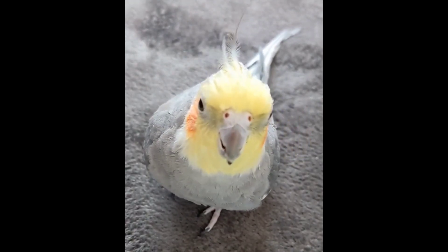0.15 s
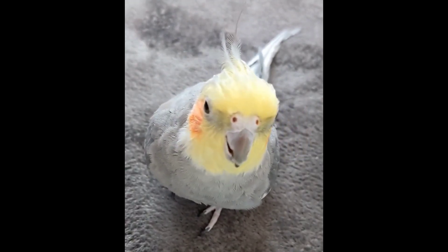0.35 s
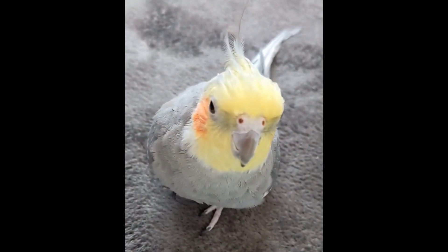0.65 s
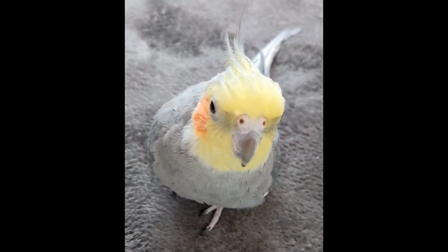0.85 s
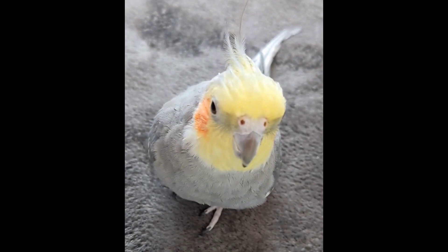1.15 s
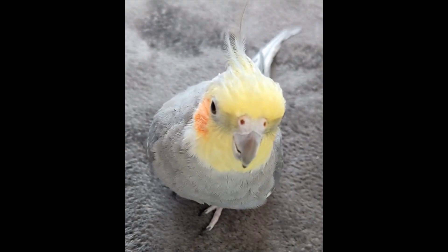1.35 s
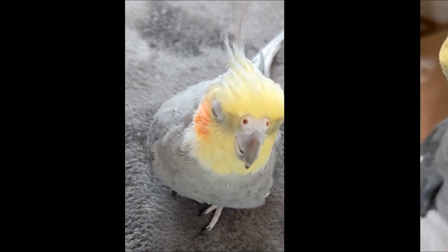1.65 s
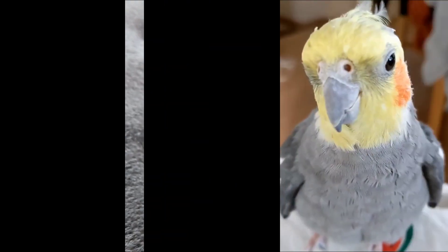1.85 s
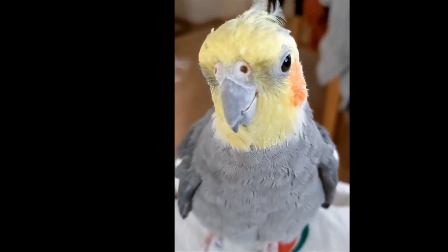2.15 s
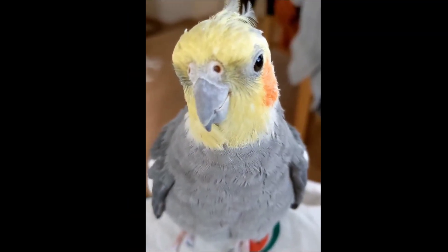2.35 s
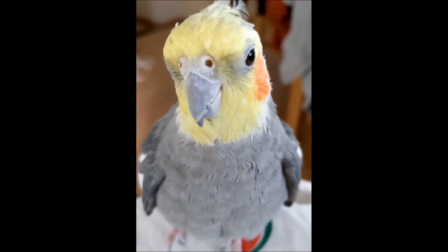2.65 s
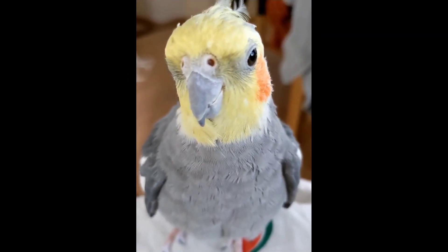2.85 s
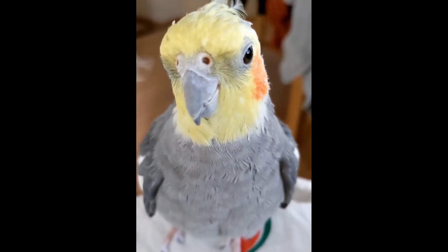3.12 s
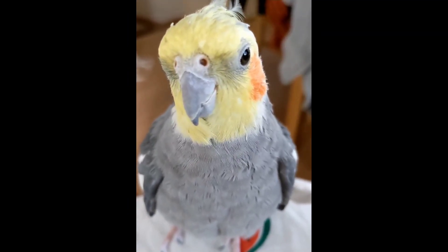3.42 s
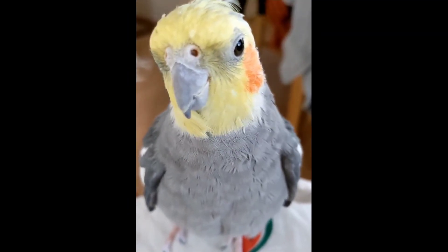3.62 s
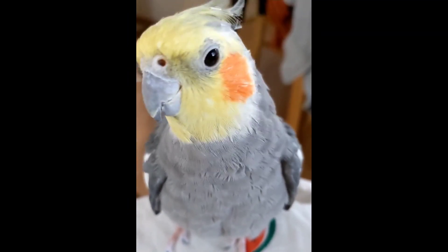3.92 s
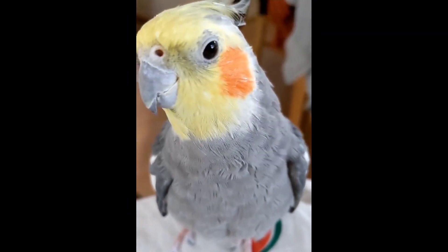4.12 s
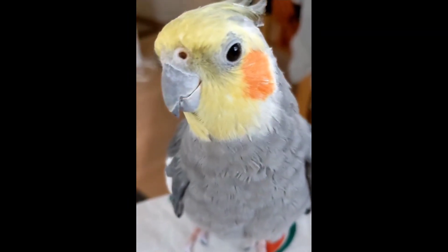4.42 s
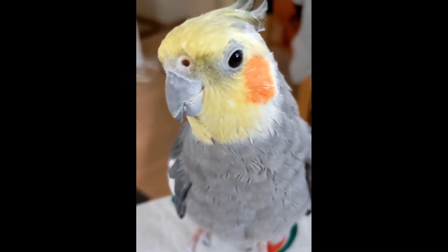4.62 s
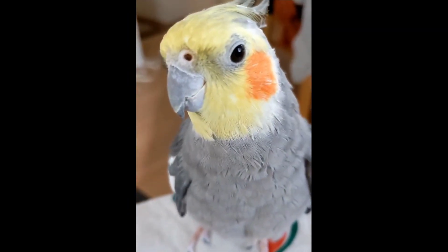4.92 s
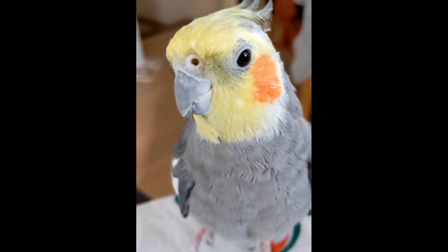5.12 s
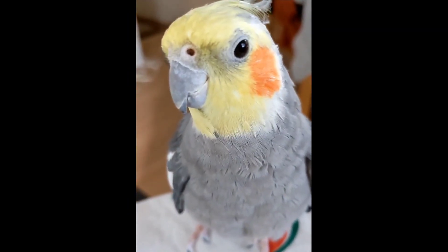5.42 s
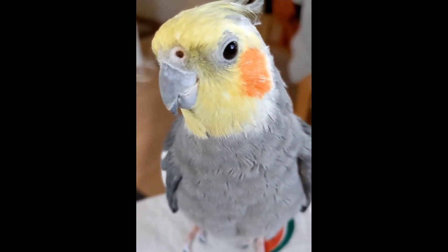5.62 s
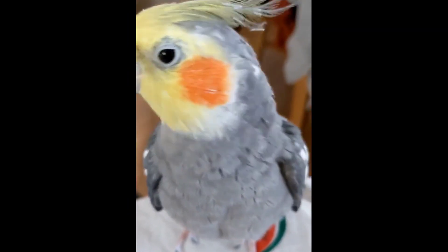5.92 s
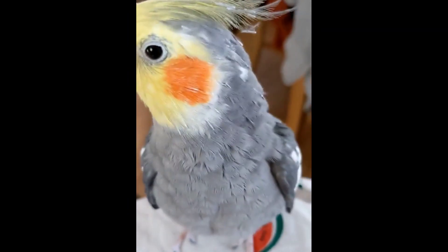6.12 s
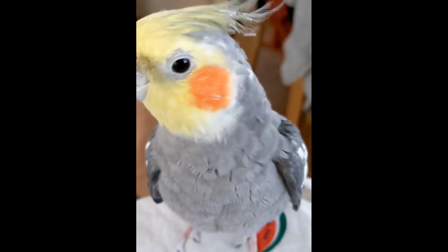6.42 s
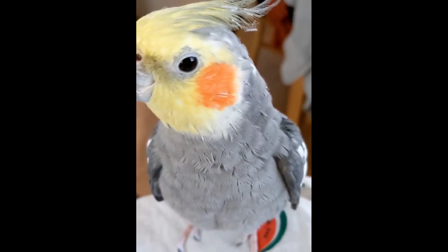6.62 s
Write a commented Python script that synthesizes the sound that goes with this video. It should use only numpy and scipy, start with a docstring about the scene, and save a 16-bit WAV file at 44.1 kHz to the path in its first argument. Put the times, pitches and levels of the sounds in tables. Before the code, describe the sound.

Over a faint humming rumble, one cockatiel chirps reedily and slides sharply up and then down, its later notes weakening. A second bird overlaps it, growing louder with clear, rounded whistles separated by short gaps. The hum gives way to thin room air. Quiet peeps, beak ticks and brief feather rustles sit between calls, all close-miked with a short room ring, drier on the first bird.

```python
"""A low humming rumble gives way to lighter room air as two cockatiels call close to a stereo microphone.
The first bird opens with reedy chirps and two wide slides, then fainter, sometimes rasping notes.
The second joins it and goes on alone, with clear arched whistles and soft falling peeps; rustles and ticks dot the calls.
Each note is a train of syrinx pulses on an arch or slide of pitch, rough at its ends.
Throat and beak filter the pulses, and the room adds a short ring, drier for the first bird."""
import sys
import numpy as np
from scipy import signal
from scipy.fft import rfft, irfft, next_fast_len
from scipy.io import wavfile
from scipy.ndimage import uniform_filter1d, minimum_filter1d

SR = 44100
rng = np.random.default_rng(int(sys.argv[2]) if len(sys.argv) > 2 else 0)


def bounce(signal):
    """Save signal as a 16-bit WAV file at the path given by the first command-line argument."""
    frames = np.transpose(np.atleast_2d(signal))
    limited = np.clip(frames, -1, 1)
    pcm = np.round(limited * 32767).astype(np.int16)
    wavfile.write(sys.argv[1], SR, pcm)


N = 298557

REEDY_EDGE_ROUGH, REEDY_EDGE_S = 0.39, 0.009   # added roughness and its time at both ends of a reedy note


def from_db(db):
    """Decibels to amplitude: 20 dB is a factor of ten."""
    return 10 ** (np.asarray(db) / 20)


def rms_one(x):
    """Scale to unit mean power."""
    return x / np.sqrt(np.mean(x ** 2) + 1e-20)


def at_hz(points, hz, axis=1):
    """Interpolate one column of a table along logarithmic frequency."""
    points = np.array(points)
    return np.interp(np.log(np.maximum(hz, 1)), np.log(points[:, 0]), points[:, axis])


def band(x, low_hz, high_hz):
    """Butterworth band-pass: a flat pass band with smooth skirts."""
    edges_hz = [low_hz, min(high_hz, SR / 2 - 1000)]
    return signal.sosfilt(signal.butter(2, edges_hz, "band", fs=SR, output="sos"), x)


def flutter(size, width_hz):
    """Low-passed random motion of unit spread, mostly slower than width_hz."""
    padded = next_fast_len(size)
    hz = np.fft.rfftfreq(padded, 1 / SR)
    spectrum = rfft(rng.standard_normal(padded)) / (1 + (hz / width_hz) ** 2)
    return rms_one(irfft(spectrum, padded)[:size])


def add(out, sound, start):
    """Superpose a sound from a given sample on."""
    first, last = max(start, 0), min(start + sound.shape[-1], N)
    out[:, first:last] += sound[:, first - start:last - start]


def room_noise(spectrum):
    """Diffuse noise: a shared and an opposed part set the correlation of left and right by frequency."""
    # left-right likeness of the noise: hz, likeness (0-1)
    likeness = [(60, 0.78), (150, 0.28), (400, 0.83), (2000, 0.068)]
    hz = np.fft.rfftfreq(N, 1 / SR)
    mid, side = rfft(rng.standard_normal((2, N))) * from_db(at_hz(spectrum, hz))
    alike = np.clip(at_hz(likeness, hz), 0, 1)
    stereo = np.sqrt(1 + alike) * mid + np.sqrt(1 - alike) * side * [[1], [-1]]
    return rms_one(irfft(stereo, N))


def background():
    """Steady broadband noise plus tonal hum: a humming rumble gives way to lighter room air."""
    # spectrum of the early rumble, before scaling to unit power: hz, relative_db (per Hz)
    rumble_spectrum = [(25, -25), (60, -13.5), (115, -13), (180, -6.5), (280, -20.5), (500, -23.5),
                       (1000, -28), (3000, -32.5), (16000, -41.5)]
    # spectrum of the later air, before scaling to unit power: hz, relative_db (per Hz)
    air_spectrum = [(25, -28.5), (65, -5.5), (130, -13), (210, -4), (330, -12.5), (700, -17.5), (1150, -15),
                    (1600, -23), (4000, -28), (16000, -36)]
    # course of both levels, before the left-right balance: time_s, rumble_db, air_db
    level_course = [(0, -63.5, -84.5), (.6, -63, -81), (1.402, -71, -75.5), (2.1, -72.5, -73.5),
                    (2.6, -98.5, -67), (3.8, -102, -68), (4.398, -102, -67), (6.77, -99, -67.5)]
    # appliance hum: hz, level_db (against the rumble)
    hum_lines = [(115, -6), (171, -4.5)]
    t = np.arange(N) / SR
    s, rumble_db, air_db = np.transpose(level_course)
    hum = 0
    for hz, db in hum_lines:
        phase = 2 * np.pi * hz * t + 0.5 * flutter(N, 2.7)
        hum = hum + from_db(db) * np.sqrt(2) * np.sin(phase)
    rumble = from_db(np.interp(t, s, rumble_db)) * (room_noise(rumble_spectrum) + hum)
    air = from_db(np.interp(t, s, air_db)) * room_noise(air_spectrum)
    return (rumble + air) * from_db([[-1.4], [1.2]])


def rustles():
    """Feathers and beak as transients: band-limited noise with a quick rise and exponential decay."""
    # soft rustles and beak ticks: start_s, decay_s, level_db, low_hz, high_hz
    rustle_table = [(1.278, .006, -69, 8000, 12000), (1.445, .006, -62.5, 8000, 11930),
                    (2.988, 0.0026, -54.5, 4000, 14000), (4.033, 0.0014, -51.5, 4000, 13000),
                    (4.895, .08, -56.5, 3200, 6500), (5.078, 0.045, -57, 3200, 6900),
                    (5.683, 0.032, -60, 400, 6000), (5.699, 0.026, -54, 77.5, 600)]
    rise_share = 0.05   # rise time as a share of the decay
    out, t = np.zeros((2, N)), np.arange(SR // 4) / SR
    for s, decay_s, level_db, low_hz, high_hz in rustle_table:
        noise = band(rng.standard_normal((2, len(t))), low_hz, high_hz)
        grain = rms_one(noise * from_db(2.6 * flutter(len(t), 112)))
        puff = np.exp(-t / decay_s) * (1 - np.exp(-t / (rise_share * decay_s)))
        add(out, from_db(level_db) * grain * puff, int(s * SR))
    return out


def room(wet_db, treble_db, early_db, early_s, ring, wall_s, wall_db):
    """Reverberation: near reflections, a frequency-dependent exponential tail and a scattered wall echo."""
    # 60 dB decay time, to be multiplied by ring: hz, unscaled_s
    decay_times = [(1000, 0.13), (2500, 0.57), (5000, 0.36), (8000, 0.13), (14000, 0.44)]
    scatter_s, wall_band_hz = 0.0018, (1500, 4100)   # the far wall smears and dulls its echo
    t = np.arange(SR // 2) / SR
    corners = np.geomspace(700, 17000, 8)
    response = 0
    for low, high in zip(corners, corners[1:]):
        hz = np.sqrt(low * high)
        tail = np.exp(-np.log(1000) * t / (ring * at_hz(decay_times, hz)))
        early = from_db(early_db) * np.exp(-t / early_s)
        gain = from_db(at_hz([(2500, 0.023), (12000, treble_db)], hz))
        noise = rng.standard_normal((2, len(t))) * (tail + early) * (t > 0.003)
        response = response + gain * band(noise, low, high)
    smear = (t > wall_s) * np.exp(-np.abs(t - wall_s) / scatter_s)
    wall = band(rng.standard_normal((2, len(t))) * smear, *wall_band_hz)
    return from_db(wet_db) * response + from_db(wall_db) * wall


def note(contour, overtone_db, tilt_db, throat, waver, jitter, jitter_hz, shimmer, doubling, limp,
         fray, fray_hz, bloom, hiss_db, rasp_db, air_hz, edge_s):
    """Source and filter: uneven syrinx pulses and breath pass the throat to both ports; also gives the start."""
    # the left port lies farther from the birds: hz, lag_ms
    left_lag = [(1700, 0.22), (2100, 0.26), (2700, 0.26), (3200, .3), (8000, .3)]
    doubling_from_rough = 0.35   # roughness above which the period doubles
    top_overtone_hz, overtone_fade_hz = 19000, 2000
    s, pitch, level_db, rough = np.transpose(contour)
    start, size = int(s[0] * SR) - 512, next_fast_len(int((s[-1] - s[0]) * SR) + 1536)
    t = (start + np.arange(size)) / SR
    pitch, level_db, rough = (np.interp(t, s, c) for c in (pitch, level_db, np.clip(rough, 0, 1)))
    pitch = uniform_filter1d(pitch, size=300)   # muscles round every turn of the glide
    unsteady = 1 + waver * flutter(size, 120) + jitter * rough * flutter(size, jitter_hz)
    phase = 2 * np.pi * np.cumsum(pitch * unsteady) / SR
    # the membranes close harder, and give more overtones, where the note is loudest
    overtone_db = overtone_db + bloom * (level_db - level_db.max())
    # very rough membranes swing strong and weak in turn, which puts lines between the harmonics
    alternation = (doubling * np.maximum(rough - doubling_from_rough, 0) + limp) * np.cos(phase / 2)
    pulses, power = 0, 0
    for k in range(1, 11):
        strength = np.clip((top_overtone_hz - k * pitch) / overtone_fade_hz, 0, 1)
        if k > 1:
            strength = strength * from_db(overtone_db + tilt_db * np.log2(k / 2))
        # no two pulses have quite the same shape, so the high overtones fray most
        shape = alternation + fray * (rough + 0.016) * flutter(size, fray_hz)
        pulses = pulses + strength * np.cos(k * phase + (k - 1) * shape)
        # power of the cosine behind the throat, averaged over both sides
        heard = sum(from_db(at_hz(throat, k * pitch, axis=side)) ** 2 for side in (1, 2)) / 4
        power = power + strength ** 2 * heard
    swing = 1 + shimmer * rough * np.tanh(flutter(size, 470)) + alternation
    # bright air escapes once a cycle
    high_pass = signal.butter(1, min(air_hz, 15000), "high", fs=SR, output="sos")
    air = signal.sosfilt(high_pass, rng.standard_normal(size))
    air = air * (from_db(hiss_db) + from_db(rasp_db) * rough) * from_db(overtone_db)
    air = air * (1 + 0.5 * np.cos(phase))
    gate = np.clip(np.minimum(t - s[0], s[-1] - t) / edge_s + 1, 0, 1) ** 2
    source = rfft((pulses * swing + air) * gate * from_db(level_db) / np.sqrt(power))
    hz = np.fft.rfftfreq(size, 1 / SR)
    source = source * hz ** 2 / (hz ** 2 + 500 ** 2)   # a small beak radiates little bass
    lag_s = at_hz(left_lag, hz) / 1000
    left = source * from_db(at_hz(throat, hz, axis=1)) * np.exp(-2j * np.pi * hz * lag_s)
    right = source * from_db(at_hz(throat, hz, axis=2))
    return irfft([left, right], size), start


def bird(notes, throat, response, **voice):
    """Direct sound plus its convolution with the room; head turns shift the balance from note to note."""
    out = np.zeros((2, N))
    for overtone_db, tilt_db, shift_db, contour in notes:
        sound, start = note(contour, overtone_db, tilt_db, throat, **voice)
        sound = sound * from_db([[shift_db / 2], [-shift_db / 2]])
        add(out, sound, start)
        add(out, signal.fftconvolve(sound, response, axes=1), start)
    return out


def ages(length_s):
    """Sampling of a note's duration, in seconds since its start."""
    return np.linspace(0, length_s, 200)


def fading(age, time_s):
    """Stretched exponential: falls from 1 towards 0 in about the given time."""
    return np.exp(-(np.abs(age) / time_s) ** 1.5)   # the power sets how squarely a note starts and stops


def arch(age, turn_s, first_hz, turn_hz, last_hz):
    """Frequency glide to a turning point, where it levels off, and away again."""
    # power 1 gives a pointed arch, 2 a parabola
    away = np.interp(age, [0, min(turn_s, age[-1]), age[-1]], [1, 0, 1]) ** 1.3
    return turn_hz + (np.where(age < turn_s, first_hz, last_hz) - turn_hz) * away


def envelope(age, attack_s, release_s, swell_db=0):
    """Amplitude envelope in dB: attack, a body that swells or sinks evenly, release."""
    edge_db = 19.5   # how far below its body a note starts and stops
    return swell_db * (age / age[-1] - 0.5) - edge_db * (fading(age, attack_s) + fading(age[-1] - age, release_s))


def edges(age, edge_s):
    """Onset and offset instability: near 1 at both ends, where the membranes swing unevenly, 0 in the body."""
    return fading(age, edge_s) + fading(age[-1] - age, edge_s)


# each call below yields overtone_db, tilt_db, shift_db and a contour: time_s, pitch_hz, level_db, roughness

def peeps():
    """Coupled pitch and loudness: soft notes of the second bird fade as their pitch sinks."""
    # start_s, length_s, first_hz, top_hz, last_hz, level_db, roughness (0-1),
    # overtone_db, tilt_db (per octave), shift_db (left against right)
    peep_table = [ (2.042, 0.059, 2090, 2063, 1706, -29.5, 0.11, -6, 3.5, 9),
                  (2.513, 0.056, 2076, 2128, 1770, -25, 0.16, -1.5, 1, -.5),
                  (3.019, 0.016, 2000, 2030, 1980, -44.5, 0, -21.5, 5.5, 1),
                  (4.341, 0.07, 2160, 2182, 1760, -18.5, 0.11, -3, -1.5, 0.5),
                  (6.329, 0.067, 2117, 2153, 1650, -22, 0.28, -9.5, 1, -2),
                  (6.484, 0.084, 1546, 2118, 1818, -18, 0.28, -10.5, 6, 2)]
    top_share, db_per_octave = 0.28, 49.5   # place of the top as a share of the length; fade with pitch
    attack_s, release_s, edge_rough, edge_s = 0.002, 0.0011, 0.17, 0.0054
    for s, length_s, first_hz, top_hz, last_hz, level_db, rough, *colour in peep_table:
        age = ages(length_s)
        pitch = arch(age, top_share * length_s, first_hz, top_hz, last_hz)
        level = level_db + db_per_octave * np.log2(pitch / top_hz) + envelope(age, attack_s, release_s)
        yield *colour, np.transpose([s + age, pitch, level, rough + edge_rough * edges(age, edge_s)])


def reedy_notes():
    """Shallow frequency arches of the first bird, clean or roughened into a rasp."""
    # start_s, length_s, turn_s (after the start), first_hz, turn_hz, last_hz, level_db, swell_db, attack_s,
    # roughness (0-1), overtone_db, tilt_db (per octave), shift_db (left against right)
    reedy_table = [ (-.09, .1, .02, 2137, 2200, 1526, -14, -17, 0.0039, 0.17, 3.5, 0, 0.5),
                   (0.512, 0.11, 0.046, 1545, 1729, 1627, -9.5, 4.5, .012, 0.01, 1.5, -1, 2),
                   (0.617, 0.047, 0.017, 1578, 1588, 1480, -22.5, -7.5, 0.0041, 0.33, -9, 3, 3),
                   (1.567, .112, .06, 1460, 1620, 1510, -26.5, 0, .012, .52, -3.5, -.5, 3),
                   (1.669, 0.11, 0.03, 1505, 1731, 1550, -17, -12.5, 0.017, 0.04, -6, 1.4, 1.5),
                   (1.814, 0.11, 0.085, 1668, 1556, 1793, -21.5, 1.5, 0.005, 0, -8, -0.5, 1.5),
                   (2.206, .082, 0.03, 1470, 1613, 1517, -30.5, 3, 0.0068, 0, -4, 2.7, 0),
                   (2.27, 0.086, 0.035, 1490, 1609, 1390, -32, -12, 0.011, 0.12, -9, -0.5, 1.5),
                   (2.671, 0.1, 0.064, 1504, 1700, 1576, -44, 0, 0.0099, 0.25, 0.5, -0.5, 0.5)]
    release_s = 0.0077
    for (s, length_s, turn_s, first_hz, turn_hz, last_hz,
         level_db, swell_db, attack_s, rough, *colour) in reedy_table:
        age = ages(length_s)
        pitch = arch(age, turn_s, first_hz, turn_hz, last_hz)
        level = level_db + envelope(age, attack_s, release_s, swell_db)
        rough = rough + REEDY_EDGE_ROUGH * edges(age, REEDY_EDGE_S)
        yield *colour, np.transpose([s + age, pitch, level, rough])


def slides():
    """Wide frequency glides of the first bird, with a burst of instability where the pitch moves steeply."""
    # pitch curve of the upward slide: time_s, pitch_hz
    SLIDE_UP = [(0.152, 2026), (0.166, 2120), (0.174, 2373), (0.182, 2790), (0.184, 2750), (0.21, 3068),
                (0.244, 3130), (0.262, 2856), (0.266, 2550)]
    # pitch curve of the downward slide: time_s, pitch_hz
    SLIDE_DOWN = [(0.319, 1642), (0.325, 1920), (0.337, 2130), (0.369, 2174), (0.395, 1912), (0.417, 1570),
                  (0.432, 1520)]
    # curve, level_db, attack_s, release_s, crack_s (after the start),
    # overtone_db, tilt_db (per octave), shift_db (left against right)
    slide_table = [ (SLIDE_UP, -6.2, .007, .009, .026, -8, -.35, 1.5),
                   (SLIDE_DOWN, -9, 0.0045, .017, .082, -4, -1.2, 0.81)]
    crack_rough, crack_width_s = 0.33, 0.017
    for curve, level_db, attack_s, release_s, crack_s, *colour in slide_table:
        s, hz = np.transpose(curve)
        age = ages(s[-1] - s[0])
        crack = crack_rough * fading(age - crack_s, crack_width_s)
        rough = REEDY_EDGE_ROUGH * edges(age, REEDY_EDGE_S) + crack
        level = level_db + envelope(age, attack_s, release_s)
        yield *colour, np.transpose([s[0] + age, np.interp(s[0] + age, s, hz), level, rough])


def whistles():
    """Frequency arches of the second bird: a rough scoop as the voice builds, a clearer arch, a rough drop."""
    # start_s, length_s, scoop_s, top_s (after the start), release_s, first_hz, top_hz, last_hz (of the arch
    # before scoop and drop), level_db, swell_db, roughness (0-1), overtone_db, tilt_db (per octave),
    # shift_db (left against right)
    whistle_table = [ (1.766, 0.098, 0.007, 0.054, 0.0063, 2424, 2544, 2310, -22.5, -2, 0.11, -3.5, -0.5, 4),
                     (2.205, 0.1, 0.0065, 0.089, 0.0035, 2275, 2657, 2500, -13.5, -4, 0.02, -1.5, 1, 2.5),
                     (2.684, 0.08, 0.0046, 0.03, 0.005, 2382, 2415, 2372, -12, -0.5, 0.01, -3, -10, 0.5),
                     (3.198, 0.1, 0.0044, 0.058, 0.0055, 2360, 2489, 2364, -7, 2, 0.03, -0.5, -2.5, 2),
                     (4.055, 0.099, 0.0083, 0.061, 0.008, 2470, 2721, 2492, -4, -14.5, 0, 1.5, -1, 3),
                     (4.498, 0.097, 0.0075, 0.077, 0.0046, 2373, 2679, 2246, -8, -1.5, 0.07, -1.5, -2, 2),
                     (4.959, 0.082, 0.0063, 0.041, 0.0084, 2240, 2351, 2214, -5.5, -0.5, 0, -6, 5, 2),
                     (5.44, 0.11, 0.006, 0.049, 0.008, 2302, 2556, 2345, -7.5, -2.5, 0.04, -4.5, 3.5, 3.5),
                     (5.998, .087, 0.007, 0.017, 0.0076, 2149, 2219, 2060, -14.5, -7.5, 0.16, -4.5, 8, 0)]
    scoop, drop, drop_s = 0.27, 0.24, 0.007   # depths as shares of the pitch, and the time of the drop
    edge_rough, edge_s = 0.6, 0.012
    for (s, length_s, scoop_s, top_s, release_s, first_hz, top_hz, last_hz,
         level_db, swell_db, rough, *colour) in whistle_table:
        age = ages(length_s)
        slack = scoop * fading(age, scoop_s) + drop * fading(length_s - age, drop_s)
        pitch = arch(age, top_s, first_hz, top_hz, last_hz) * (1 - slack)
        level = level_db + envelope(age, scoop_s, release_s, swell_db)   # the attack lasts as long as the scoop
        yield *colour, np.transpose([s + age, pitch, level, rough + edge_rough * edges(age, edge_s)])


def scene():
    """Superposition of both birds, their reflections and the quiet room; the first bird's ring is shorter."""
    # throat and beak of the first bird as heard on each side: hz, left_db, right_db
    reedy_throat = [(400, -29, -24.5), (748, -18, -17), (1020, -24.5, -14.5), (1550, -13.5, -8.5),
                    (2000, -5.5, -1.5), (3200, -7.5, -3), (4000, -12, -11.5), (5482, -16, -10.5),
                    (5595, -34.5, -23.5), (7140, -22.5, -16.5), (8970, -35.5, -27), (9660, -67.5, -47),
                    (10600, -61, -38), (11240, -44.5, -21.5), (13000, -55.5, -29), (14600, -44.5, -21.5),
                    (16000, -76, -48.5)]
    # throat and beak of the second bird as heard on each side: hz, left_db, right_db
    clear_throat = [(500, -16.5, -1), (1070, -15, -6), (1670, -3, 3), (2200, -10, 1), (2500, -10, -4.5),
                    (2750, -11.5, -5.5), (3870, -18.5, -22.5), (4000, -40, -17), (5160, -38.5, -27),
                    (6655, -58, -32), (7190, -44.5, -22), (9660, -63, -38), (12000, -51.5, -27),
                    (13000, -57.5, -23.5), (14800, -53.5, -34), (15730, -78, -48.5)]
    reedy_room = room(wet_db=-54.5, treble_db=-3.0, early_db=9.5, early_s=0.012,
                      ring=0.61, wall_s=0.045, wall_db=-51)
    clear_room = room(wet_db=-57, treble_db=-2.5, early_db=14.0, early_s=0.017,
                      ring=0.73, wall_s=0.07, wall_db=-56)
    reedy = bird([*slides(), *reedy_notes()], reedy_throat, reedy_room,
                 waver=0.0022, jitter=0.034, jitter_hz=400, shimmer=1.0, doubling=1.9, limp=0.003,
                 fray=0.48, fray_hz=500, bloom=0.023, hiss_db=-31, rasp_db=-12, air_hz=6000, edge_s=0.0025)
    clear = bird([*whistles(), *peeps()], clear_throat, clear_room,
                 waver=0.0036, jitter=0.023, jitter_hz=499, shimmer=0.27, doubling=0.28, limp=0.0056,
                 fray=0.49, fray_hz=600, bloom=0.6, hiss_db=-32, rasp_db=2.5, air_hz=8000, edge_s=0.0015)
    return background() + rustles() + reedy + clear


def record(dry):
    """Peak limiting by a smoothed gain common to both sides, then a steep elliptic low-pass."""
    gain = np.minimum(1, 0.96 / (np.abs(dry).max(axis=0) + 1e-9))
    gain = uniform_filter1d(minimum_filter1d(gain, size=201), size=201)
    low_pass = signal.ellip(10, 0.1, 80, 16100, fs=SR, output="sos")   # ripple dB, stop-band dB, cutoff Hz
    return signal.sosfilt(low_pass, dry * gain)


dry = scene()
out = record(dry)
bounce(out)
```